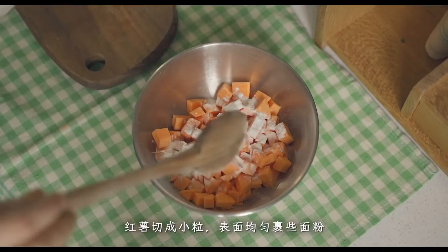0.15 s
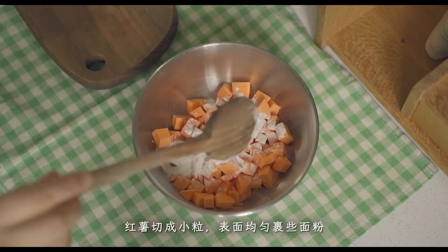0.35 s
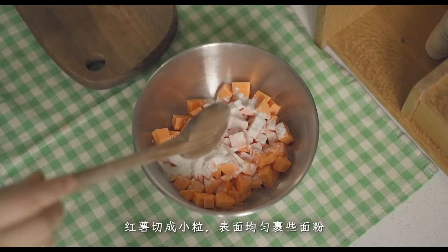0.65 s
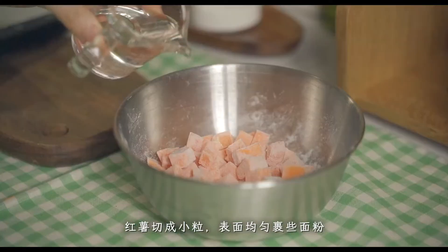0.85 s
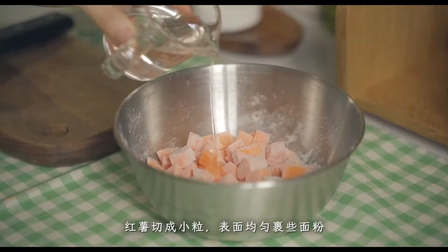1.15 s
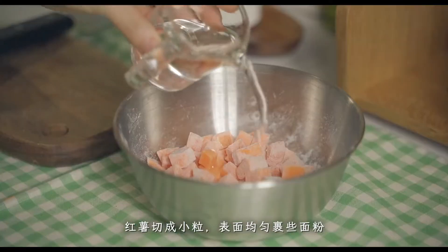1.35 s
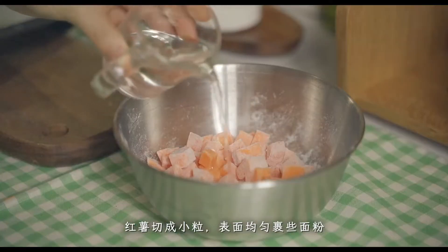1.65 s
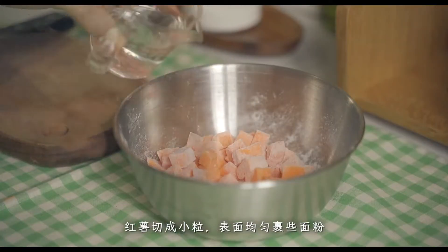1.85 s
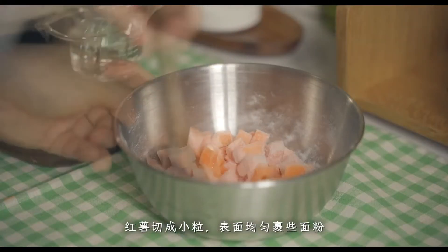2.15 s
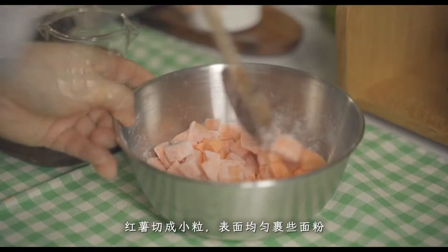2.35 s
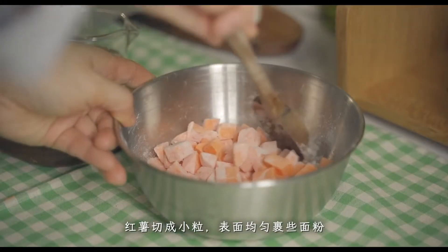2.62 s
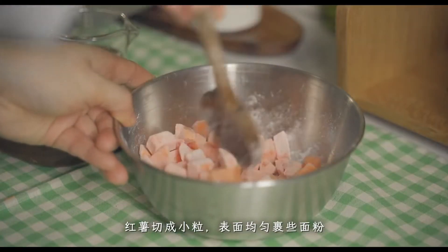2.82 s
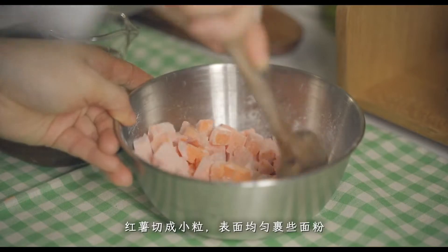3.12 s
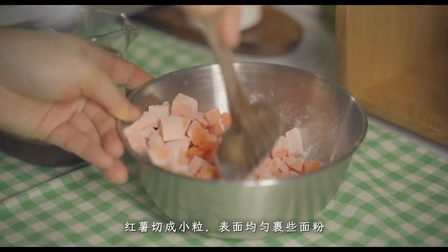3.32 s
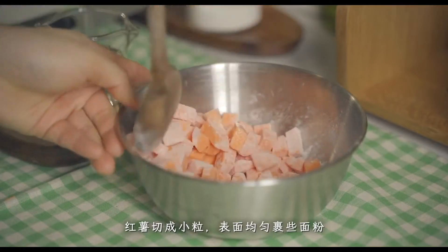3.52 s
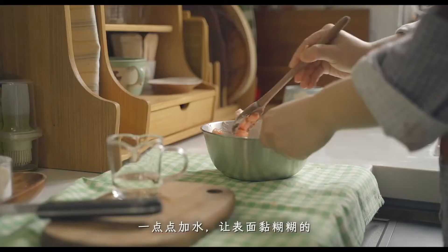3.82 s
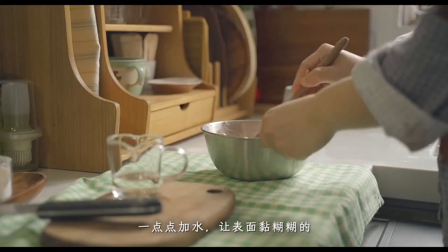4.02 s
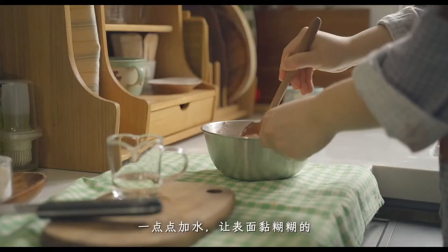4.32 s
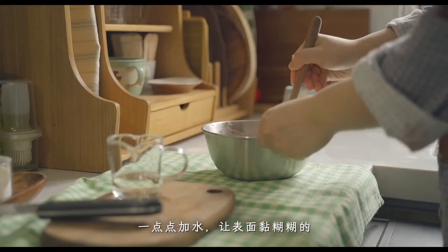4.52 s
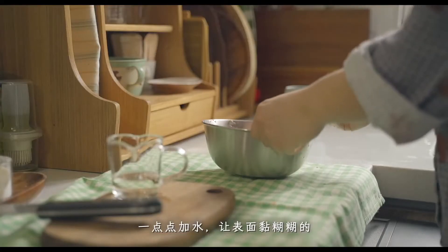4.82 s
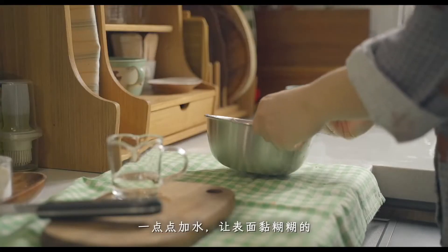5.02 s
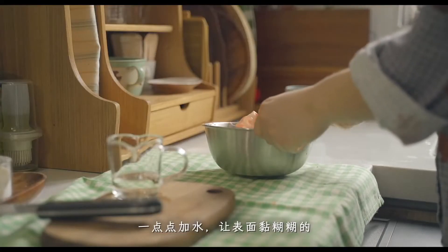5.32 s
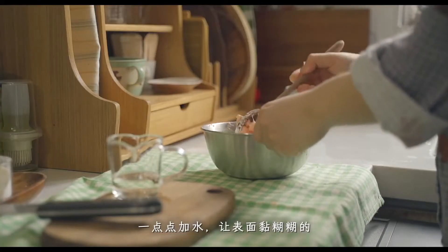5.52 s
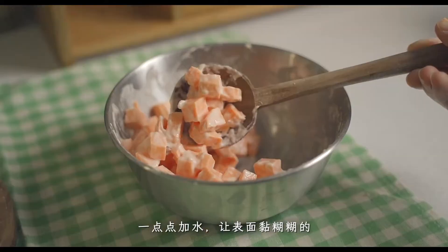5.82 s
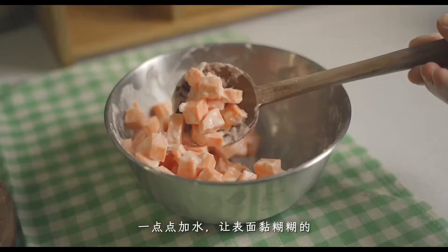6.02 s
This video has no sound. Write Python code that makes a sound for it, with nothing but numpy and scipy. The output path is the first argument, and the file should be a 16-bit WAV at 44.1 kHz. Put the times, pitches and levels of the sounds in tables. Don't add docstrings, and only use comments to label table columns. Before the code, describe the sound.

In a quiet kitchen, close to a steel bowl, almost nothing happens for two seconds beyond low table rumble and tiny ticks. Then a wooden spoon scrapes floured cubes in hissing strokes. A loud woody knock rings the damped bowl, more rasps follow, a second brighter knock cracks out, and the stirring fades into soft plopping thuds.

```python
import sys
import numpy as np
from scipy import signal
from scipy.fft import rfft, irfft, next_fast_len
from scipy.io import wavfile
from scipy.ndimage import uniform_filter1d

SR = 44100
rng = np.random.default_rng(int(sys.argv[2]) if len(sys.argv) > 2 else 0)


def boost_factor(decibels):
    exponent = np.asarray(decibels, float) / 20
    return 10 ** exponent


def output_pcm(signal):
    pcm = np.clip(np.atleast_2d(signal).T, -1, 1) * 32767
    wavfile.write(sys.argv[1], SR, np.round(pcm).astype(np.int16))


N = 271655
TOP_HZ = 15500


def unit(x):
    return x / np.sqrt(np.mean(x ** 2))


def peak(x, db):
    return x * boost_factor(db) / np.max(np.abs(x))


def add(out, s, x):
    i = int(s * SR)
    out[i:i + len(x)] += x[:N - i]


def on_log(hz, table):
    points = np.array(table)
    return np.interp(np.log(np.maximum(hz, 1)), np.log(points[:, 0]), points[:, 1])


def shape(x, gain):
    size = next_fast_len(len(x))
    hz = np.arange(size // 2 + 1) * SR / size
    return irfft(rfft(x, size) * gain(hz), size)[:len(x)]


def between(lo_hz, hi_hz):
    return lambda hz: 1 / np.sqrt((1 + (lo_hz / np.maximum(hz, 1)) ** 24) * (1 + (hz / hi_hz) ** 24))


def burst(gain):
    return shape(rng.standard_normal(SR // 4), gain)


def walk(rate, size=N):
    hold = int(SR / rate)
    held = np.repeat(rng.standard_normal(size // 200 + 2)[:size // hold + 1], hold)[:size]
    return 1.3 * uniform_filter1d(uniform_filter1d(held, hold), hold)


def fade(t60, rise_s):
    t = np.arange(SR // 4) / SR
    return (1 - np.exp(-t / abs(rise_s))) * np.exp(-np.log(1000) * t / max(t60, 1e-3))


def ring(modes, phase=0, stretch=1, size=SR // 4):
    hz, db, t60 = (column[:, None] for column in np.transpose(modes))
    t = np.arange(size) / SR
    fall = np.exp(-np.log(1000) * t / np.maximum(t60 * stretch, 1e-3))
    return np.sum(boost_factor(db) * np.sin(2 * np.pi * hz * t + phase) * fall, axis=0)


# (frequency [Hz], t60 [s])
SHELL_DECAY = [(150, .15), (500, 0.22), (1500, 0.054), (3500, 0.08), (8000, 0.056), (14000, 0.11)]


def crowd(count, colour, stretch, size):
    chance = rng.random((count, 3))
    hz = 120 * (TOP_HZ / 120) ** ((np.arange(count) + chance[:, 0]) / count) ** .6
    t60 = on_log(hz, SHELL_DECAY) * stretch
    spacing = uniform_filter1d(np.gradient(hz), size=9)
    db = on_log(hz, colour) + 10 * np.log10(spacing / t60) + 6 * (chance[:, 1] - .5)
    return ring(np.transpose([hz, db, t60]), 2 * np.pi * chance[:, 2:], size=size)


# (frequency [Hz], density [dB per Hz])
ROOM_COLOUR = [(260, -29), (450, -3), (801, -8.5), (888, -9.5), (1000, -10), (2860, -26), (4930, -25),
               (6440, -25), (6930, -27), (8280, -29), (9320, -22.5), (12700, -27), (13900, -23.5),
               (15400, -25)]
# (frequency [Hz], level [dB])
WHINE_TONES = [(4344, -99), (4877, -92), (6751, -91.5), (7122, -87.5), (7499, -101.5), (13501, -89),
               (13873, -86.5), (14250, -91), (14626, -93)]


def kitchen():
    colour = lambda f: boost_factor(on_log(f, ROOM_COLOUR)) * between(480, SR)(f)
    air = boost_factor(-66.5) * unit(shape(rng.standard_normal(N), colour))
    lows = shape(air, between(1, 1500))
    swell = boost_factor(2.8 * walk(2.5))
    t = np.arange(N) / SR
    whine = sum(boost_factor(db) * np.sqrt(2) * np.sin(2 * np.pi * hz * t) for hz, db in WHINE_TONES)
    return air + lows * (swell - 1) + whine


# (time [s], swell [s], deep level [dB], board level [dB], boom level [dB])
TABLE_PUSHES = [(.2, 0.079, -75, -58, -67.5), (.55, 0.12, -71, -62, -66), (.88, 0.081, -78, -51.5, -78),
                (1.17, 0.095, -80, -56, -89), (1.95, 0.21, -80, -57.5, -89),
                (2.38, 0.13, -70, -54.5, -62.5), (2.659, 0.12, -58.5, -45, -56.5),
                (3.1, 0.05, -50, -61.5, -60.5), (3.22, 0.078, -68, -52, -55),
                (3.61, 0.058, -44.5, -44.5, -66), (3.8, 0.094, -63.5, -59, -61),
                (4.04, 0.049, -56.5, -77, -54.5), (4.45, 0.05, -61, -68, -60.5),
                (5.17, 0.049, -62, -57.5, -59), (5.4, 0.025, -52, -63, -56.5),
                (5.93, 0.052, -61, -72.5, -67.5), (6.1, .05, -67.5, -59, -79.5)]
# deep, board and boom levels [dB]
TABLE_REST = (-65.5, -62, -64.5)


def pushes():
    s, swell_s, *levels_db = np.transpose(TABLE_PUSHES)
    age = np.maximum(np.arange(N) / SR - s[:, None], 0) / swell_s[:, None]
    power = (age * np.exp(1 - age)) ** 2
    return (np.sqrt(boost_factor(2 * db) @ power + boost_factor(2 * rest_db)) for db, rest_db in zip(levels_db, TABLE_REST))


# (frequency [Hz], width [Hz], level [dB])
LOW_RESONANCES = [(200, 60, -0.5), (334, 38, 5.5), (377, 22, -7), (444, 30, -12)]


def table():
    deep, board, boom = pushes()
    noise = rng.standard_normal((3, N))

    def plank_gain(f):
        return 1 / (1 + ((f - 92) / 14) ** 2) + 0.4 / (1 + ((f - 140) / 25) ** 2)

    def hollow_gain(f):
        return 1.0 + sum(boost_factor(db) / (1 + (2 * (f - hz) / w) ** 2) for hz, w, db in LOW_RESONANCES)

    sway = shape(noise[0], lambda f: 1 / (1 + (35 / np.maximum(f, 1)) ** 4))
    sway = unit(shape(sway, between(1, 76)))
    plank = unit(shape(shape(noise[1], plank_gain), between(73, 190)))
    hollow = unit(shape(shape(noise[2], hollow_gain), between(150, 480)))
    return deep * sway + board * plank + boom * hollow


# (time [s], peak level [dB], centre frequency [Hz])
HIGH_TICKS = [(1.1394, -63, 13900), (1.5866, -48.5, 11700), (1.7579, -54, 12700), (1.812, -57, 13200),
              (1.9431, -33, 9700), (2.4194, -51, 12400), (2.5486, -55, 13730), (3.502, -48, 8900),
              (4.0405, -41, 7600), (4.059, -40, 11200), (4.0988, -47, 15000), (4.616, -36, 12200),
              (4.6498, -33, 8500), (4.68, -44, 13000), (4.84, -48, 13000), (5.558, -46.5, 12500)]
# (time [s], peak level [dB], centre frequency [Hz])
SPOON_TAPS = [(2.58, -46, 1480), (2.966, -50, 1340), (3.6222, -46, 1047), (5.2049, -36, 1480),
              (5.7526, -64, 1184)]
# (time [s], peak level [dB], centre frequency [Hz])
STEEL_CLACKS = [(2.659, -61, 3980), (4.7112, -40, 4860), (4.837, -44.5, 7300), (5.1168, -42, 5000),
                (5.419, -57, 2800), (5.2055, -56, 4080), (5.5533, -51, 4100), (5.557, -55.5, 7700),
                (4.508, -48, 4500), (4.798, -48, 9800), (5.408, -64, 11800)]
# (width [Hz], t60 [s])
SNAP_RESONANCE = [
    (7600, 0.008),
    (1490, 0.092),
    (2260, 0.14),
]


def ticks():
    out = np.zeros(N)
    for rows, (width_hz, t60) in zip((HIGH_TICKS, SPOON_TAPS, STEEL_CLACKS), SNAP_RESONANCE):
        for s, db, hz in rows:
            band = burst(lambda f: 1 / (1 + (2 * (f - hz) / width_hz) ** 4))
            snap = fade(t60 / 3, 0.00042)
            tail = 0.52 * fade(t60, 0.00058)
            echo = 0.063 * fade(0.12, 0.0025)
            add(out, s, peak(band * (snap + tail + echo), db))
    return out


# (time [s], peak level [dB], favoured pitch [Hz], brightness [dB], ring stretch [ratio])
SOFT_DROPS = [(2.859, -39, 1100, -25, 1), (2.908, -42.5, 670, -25, 1.6), (2.967, -43, 1140, -28, 5.3),
              (3.048, -47, 800, -20, 1), (3.477, -44.5, 830, -37.5, 3.4), (4.308, -40, 452, -29, 0.94),
              (5.2055, -40, 1093, -12, 0.98), (5.411, -45, 653, -22.5, 1.6), (5.447, -29.5, 868, -27, 1.34),
              (5.554, -25, 980, -18, 0.93), (5.579, -17, 1040, -21, 0.94), (5.588, -25, 760, -36, 1.1),
              (5.597, -33, 1000, -11, 0.86), (5.609, -36, 1035, -11, 1.5), (5.632, -31.5, 1040, -17, 1.85),
              (5.651, -40, 1020, -24, 0.61), (5.685, -47, 1010, -30, 0.87)]
# (frequency [Hz], level [dB], t60 [s])
LOADED_MODES = [(329.6, -4.5, 0.33), (450, -6, .15), (686, -2, .12), (830, 1, 0.22), (1023, -2, 0.04),
                (1060, 2, 0.25), (1260, -30.5, 0.092)]
# (frequency [Hz], level [dB], t60 [s])
EDGE_MODES = [(1790, 12.5, 0.018), (1890, 4, 0.041), (2010, 2, 0.061), (2770, -11, 0.076),
              (3600, -14, 0.068), (4230, -14, 0.046)]


def drops():
    out = np.zeros(N)
    for s, db, hz, bright_db, stretch in SOFT_DROPS:
        modes = [(f, d - 9 * abs(np.log2(f / hz)), t60) for f, d, t60 in LOADED_MODES]
        low = peak(ring(modes, stretch=stretch * 0.69), 0)
        low = low * (fade(0.071, .0003) + 0.4 * fade(0.74, 0.001))
        thud = peak(burst(between(0.79 * hz, 1.07 * hz)) * fade(0.21 * stretch, 0.0014), -6.0)
        knock = peak(ring([(hz, 0, .012)]) * fade(1, 0.00095), 1.5)
        dull = signal.butter(4, (.5 * hz, 1400), "band", fs=SR, output="sos")
        soft = signal.sosfilt(dull, low + thud + knock)
        edge = ring(EDGE_MODES) + 0.89 * burst(between(1700, 3900)) * fade(0.092, 0.0006)
        add(out, s, peak(soft, db) + peak(edge * fade(1, 0.00046), db + bright_db))
    return out


# (time [s], frequency [Hz], level [dB], swell [s])
RUBBED_TONES = [(.365, 4320, -74, .03), (.375, 2980, -81, .015), (.35, 2750, -82, .015),
                (.36, 12200, -77, .015), (.36, 10800, -81, .012), (.43, 4400, -84, .04),
                (.47, 2850, -81, .018), (.58, 8000, -81, .012), (.57, 2550, -82, .012),
                (2.14, 2750, -66, .04), (2.16, 9900, -56, .035), (2.135, 7600, -59, .025),
                (2.19, 1800, -69, .05), (2.21, 2300, -70, .04), (2.3, 4050, -66, .05),
                (2.37, 3000, -66, .035), (2.73, 2700, -69, .04), (3.255, 1820, -45, .025),
                (3.28, 3100, -58, .03), (4.12, 1110, -53, .012), (4.065, 1080, -58, .02),
                (4.145, 1110, -55, .01), (3.79, 1780, -58, .04), (3.79, 2800, -59, .015),
                (5.222, 1093, -56, .022), (5.25, 7800, -68, .06), (5.26, 9500, -70, .05),
                (5.25, 11200, -70, .04), (4.8, 4300, -66, .12), (4.98, 4250, -67, .08),
                (5.43, 4200, -78, .02), (5.425, 2650, -77, .012), (5.43, 1950, -75, .02),
                (5.59, 3500, -73, .03), (5.6, 4200, -77, .03), (5.585, 7400, -78, .03),
                (5.598, 2750, -68, .005), (5.57, 300, -50, .014)]
# (time [s], frequency [Hz], level [dB], swell [s])
STEEL_RINGS = [(1.99, 2550, -76, .05), (2.14, 2536, -64, .045), (2.07, 2900, -75, .05),
               (2.04, 3640, -74, .04), (1.97, 4250, -77, .03), (2.12, 6000, -73, .06),
               (2.04, 6500, -76, .06), (2.02, 7510, -69, .06), (2.14, 7494, -62, .05),
               (2.04, 7989, -70, .07), (2.08, 8380, -69, .12), (1.99, 9577, -70, .04),
               (2.15, 9695, -59, .04), (2.17, 10170, -62, .05), (2.16, 11180, -63, .05),
               (2.16, 12371, -60, .05), (5.51, 4200, -85, .05)]


def squeaks():
    out = np.zeros(N)
    t = np.arange(-SR // 4, SR // 4) / SR
    for rows, width_hz, spread in ((RUBBED_TONES, 110, .012), (STEEL_RINGS, 18, .002)):
        for s, hz, db, swell_s in rows:
            width = width_hz + spread * hz
            tone = unit(shape(rng.standard_normal(len(t)), lambda f: 1 / (1 + ((f - hz) / width) ** 2)))
            waver = boost_factor(2 * walk(50, size=len(t)))
            swell = np.exp(-(t / swell_s) ** 2)
            add(out, s - 1 / 4, boost_factor(db) * tone * waver * swell)
    return out


KNOCK_TIMES = (3.0782, 4.3737)
# (peak level [dB], spoon pitch [Hz], spoon [dB], crack [dB], bowl [dB], shell [dB], room [dB])
KNOCK_LEVELS = [
    (-3.5, 1750, 1.5, -4, -6, -4, -16),
    (-4, 2430, -13.5, -1.5, -18.5, -3.5, -15),
]
# (frequency [Hz], level [dB], t60 [s])
FIRST_BOWL = [(383.3, -5.5, 0.181), (659, 0.5, 0.14), (775, -17, 0.67), (988, -3.5, 0.17),
              (1118, -3.5, 0.25), (1400, -8, 0.18), (1743, -4.5, 0.17), (2050, -19, 0.11),
              (2530, -2, 0.0347), (2780, -20.5, 0.2), (2960, -35, 0.11), (4080, -18.5, 0.082),
              (4430, -26, 0.022)]
SECOND_BOWL = [(452, -14.5, 0.38), (588, 1, .12), (720, -7, 0.15), (974, -2.5, 0.15), (1085, -16, 0.12),
               (1286, 6, 0.082), (1520, -19, 0.082), (1740, -10.5, 0.28), (2160, -15, 0.12),
               (2500, -32.5, 0.203), (2890, -20.5, 0.1), (3490, -21.5, 0.13)]
# (frequency [Hz], density [dB per Hz])
FIRST_SHELL = [(59, -45), (100, -13), (524, -5.5), (662, -3), (872, -8.5), (1360, 0.5), (1520, -5.5),
               (1800, 0), (3250, -28.5), (4670, -23), (6840, -41), (7770, -8.5), (9020, -36), (10200, -14),
               (16000, -36.5)]
SECOND_SHELL = [(59, -40), (100, -11), (156, -16.5), (558, -4), (621, -4.5), (1130, -4), (1200, -4.5),
                (2000, -6), (2220, -7.5), (2470, -18), (3700, -18), (6420, -30), (7290, -19),
                (11200, -24.5), (16000, -43.5)]
# (frequency [Hz], level re peak [dB], t60 [s])
RIM_MODES = [
    [(4500, -26.5, .02), (7630, -21.5, .03), (10100, -19, .09), (10300, -34, .06), (11800, -35, .06),
     (13000, -38.5, .06), (14300, -35.5, .05)],
    [(3680, -29.5, .05), (7600, -28, 0.088), (9500, -28.5, .04), (11000, -33.5, .04), (12800, -34, .04)],
]


def knocks():
    out = np.zeros(N)
    bowls, shells = (FIRST_BOWL, SECOND_BOWL), (FIRST_SHELL, SECOND_SHELL)
    for s, levels, bowl, colour, rim in zip(KNOCK_TIMES, KNOCK_LEVELS, bowls, shells, RIM_MODES):
        db, hz, spoon_db, crack_db, bowl_db, shell_db, room_db = levels
        damped = [(f, level_db, min(t60, .3)) for f, level_db, t60 in bowl]
        thwack = peak(ring([(hz, 0, .0042)]) * fade(1, .001) ** 2, spoon_db)
        crack = burst(lambda f: boost_factor(0.77 * on_log(f, colour)) / (1 + (f / 11000) ** 4))
        crack = peak(crack * fade(0.013, 0.00076) ** 2, crack_db)
        body = peak(ring(damped, stretch=0.69) * fade(0.93, 0.0022), bowl_db)
        shell = crowd(count=260, colour=colour, stretch=0.93, size=SR // 4)
        shell = peak(shell * fade(0.29, 0.00029), shell_db)
        echo = burst(lambda f: boost_factor(on_log(f, colour))) * fade(0.24, 0.01)
        add(out, s, peak(thwack + crack + body + shell, db) + peak(echo, db + room_db))
        add(out, s, boost_factor(db) * ring(rim) * fade(1, .0015))
    return out


def patchy(x, lo_hz, hi_hz, spread_db):
    centres = np.geomspace(lo_hz, hi_hz, num=3)
    parts = (shape(x, lambda f: np.interp(f, centres, one)) for one in np.eye(len(centres)))
    return unit(sum(part * boost_factor(spread_db * walk(12, size=SR)[:len(x)]) for part in parts))


# (frequency [Hz], density [dB per Hz])
SCRAPE_COLOUR = [(240, -26.5), (400, 14.5), (520, -16), (906, -15.5), (1160, -17), (1400, -22.5),
                 (1790, -8.5), (2180, -28), (2840, -19.5), (6950, -20.5), (7510, -11.5), (8760, -15.5),
                 (11400, -12.5), (14600, -9.5), (16000, -18.5)]
# (frequency [Hz], width [Hz], level [dB])
SINGING_MODES = [(1100, 170, 11.5), (1890, 76, -2.5), (7730, 340, 3), (9800, 590, 3.5), (10400, 2200, 7)]
# grit, rasp and body change per change of hiss [dB per dB]
DULLING = (1, 0.82, 0.56)


def stroke(speed, contact, pile_db, top_hz, air):
    s, level_db = np.transpose(speed)
    t = np.arange(s[0], s[-1], 1 / SR)
    hiss_db = np.interp(t, s, level_db)
    along = (t - s[0]) / (s[-1] - s[0])
    slowing_db = max(level_db) - hiss_db
    grit_db, rasp_db, body_db = (db + gain_db * (along - .5) + (1 - share) * slowing_db
                                 for db, gain_db, share in zip(contact, pile_db, DULLING))
    air_db = air[0] + air[1] * (along - .5)
    metal = np.clip(contact[-1], 0, 1)
    touch = np.clip(np.minimum(t - s[0], s[-1] - t) / .004, 0, 1)
    shell = crowd(count=200, colour=[(100, 0), (16000, 0)], stretch=.3, size=SR // 20)

    def colour(hz):
        sing = sum(db / (1 + (2 * (hz - f) / w) ** 2) for f, w, db in SINGING_MODES)
        return boost_factor(on_log(hz, SCRAPE_COLOUR) + sing)

    bands = ((11000, 17000, air_db), (7200, 11000, -1.5), (4800, 7200, grit_db),
             (2300, 4800, rasp_db), (480, 2300, body_db))
    out = 0
    for lo_hz, hi_hz, db in bands:
        rough_db = 0.51 * rng.exponential(size=SR) + 1.6 * walk(61, size=SR) + 1.2 * walk(22, size=SR)
        grains = unit((rng.standard_normal((2, SR)) * boost_factor(rough_db))[:, :len(t)])
        zone = lambda f: between(lo_hz, hi_hz)(f) / (1 + (f / top_hz) ** 16)
        rung = unit(signal.fftconvolve(grains[0], shell)[:len(t)])
        sung = unit(shape(0.54 * grains[0] + 0.42 * rung, lambda f: colour(f) * zone(f)))
        smooth = unit(shape(grains[1], zone))
        rub = np.sqrt(metal) * sung + np.sqrt(1 - metal) * smooth
        band_db = hiss_db + db - 2.0 * (lo_hz > 7000)
        out = out + patchy(rub, lo_hz, hi_hz, spread_db=1.0) * boost_factor(band_db)
    return s[0], out * touch


# (time [s], level [dB])
STROKE_SPEED = [
    [(1.944, -56), (2.014, -60.5), (2.036, -53), (2.072, -57.5), (2.162, -44), (2.238, -55), (2.39, -54.5),
     (2.5, -88.5)],
    [(2.64, -104), (2.67, -67), (2.732, -68), (2.802, -43.5), (2.856, -35), (2.898, -57), (3.02, -80)],
    [(3.11, -59), (3.122, -51), (3.262, -35), (3.33, -38), (3.414, -52.5), (3.49, -57.5), (3.502, -48.5),
     (3.6, -78)],
    [(3.61, -93), (3.622, -54), (3.646, -43.5), (3.736, -39.5), (3.742, -40), (3.85, -44.5), (3.87, -94),
     (3.89, -90)],
    [(3.97, -81), (4.064, -55.5), (4.09, -58), (4.162, -57), (4.192, -66.5), (4.198, -63), (4.236, -78),
     (4.29, -91)],
    [(4.45, -72), (4.468, -62), (4.52, -55), (4.668, -51.5), (4.744, -59), (4.79, -58), (5.04, -70),
     (5.11, -88)],
    [(5.11, -86), (5.118, -71.5), (5.166, -76), (5.2, -76)],
    [(5.2, -57), (5.222, -58), (5.274, -61.5), (5.328, -69.5), (5.4, -79)],
]
# (grit re hiss [dB], wall rasp re hiss [dB], spoon body re hiss [dB], bare metal [0-1])
STROKE_CONTACT = [(-13.5, -10.5, -16, 0.65), (-6, -7.5, -13, 0.77), (-12, -15.5, -13.5, 0.86),
                  (-11, -12, -17.5, 0.7), (-1, 0.5, -3.5, 0.7), (-3.5, -2.5, -7, 0.42), (6.5, 6, 0, 0.3),
                  (-21, -4, -0.5, 0.47)]
# (grit [dB], rasp [dB], body [dB])
FOOD_PILE = [(20, 15, 22), (4, 2, 0), (3.5, -10.5, -23.5), (7, 8.5, 4), (14, 11, 12), (10, 15, 1),
             (-3, -4, -4), (3, 4.5, -18)]
HISS_TOP = [16400, 15770, 15800, 15400, 16600, 15440, 13050, 12400]
# (level re hiss [dB], gain along the stroke [dB])
HISS_AIR = [(-2, 0), (-1.5, 0), (-1.5, -14.5), (-1, 8), (-0.5, -3.5), (-4.5, -2.5), (-6, 2), (-12, 3)]


def strokes():
    out = np.zeros(N)
    for parts in zip(STROKE_SPEED, STROKE_CONTACT, FOOD_PILE, HISS_TOP, HISS_AIR):
        add(out, *stroke(*parts))
    return out


def scene():
    mix = kitchen() + table() + ticks() + drops() + squeaks() + knocks() + strokes()
    return mix[None]


def roll_off(x):
    return signal.sosfilt(signal.butter(12, 16520, fs=SR, output="sos"), x)


def record(dry):
    steep = signal.ellip(12, .3, 50, TOP_HZ, fs=SR, output="sos")
    cut = signal.sosfilt(steep, dry)
    return roll_off(cut)


dry = scene()
out = record(dry)
output_pcm(out)
```